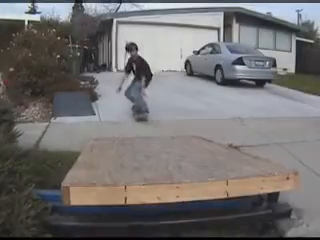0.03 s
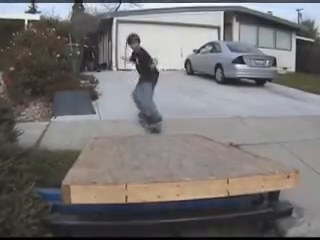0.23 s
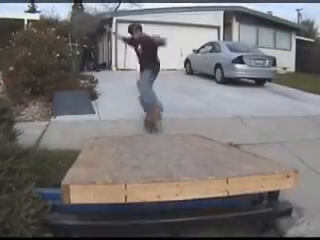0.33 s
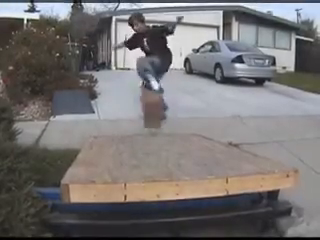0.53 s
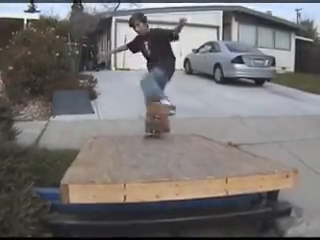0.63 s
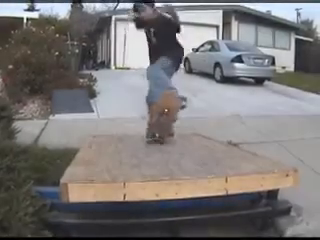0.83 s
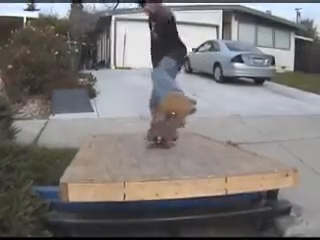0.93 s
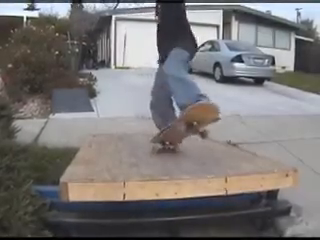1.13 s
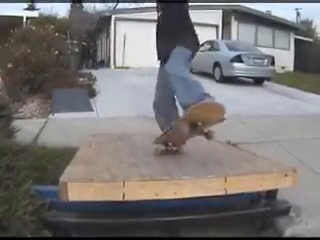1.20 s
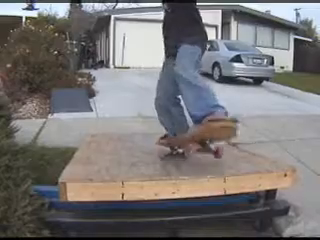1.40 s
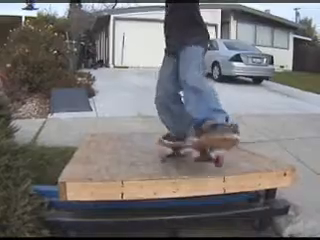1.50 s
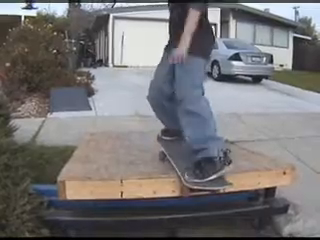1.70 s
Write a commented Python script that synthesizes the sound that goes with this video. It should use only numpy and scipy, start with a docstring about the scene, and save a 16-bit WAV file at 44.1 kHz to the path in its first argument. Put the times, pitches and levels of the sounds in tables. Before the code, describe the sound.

Skateboard wheels roll and clack, then land hard on wood with a hollow rumble.

```python
"""Skateboard jump onto a wooden platform

A skateboard rolls down a concrete driveway, clacks over a joint and pops into a jump, a shoe scraping
up the grip tape. It slams onto a hollow wooden platform and rumbles across on its back wheels while
the lifted front wheels spin free. A small, nearly mono microphone hears it from the platform's far end."""
import sys
import numpy as np
from scipy import signal
from scipy.fft import rfft, irfft
from scipy.io import wavfile
from scipy.ndimage import uniform_filter1d

SR = 44100
rng = np.random.default_rng(int(sys.argv[2]) if len(sys.argv) > 2 else 0)


def digitize_waveform(pressure):
    """Quantize a signal to 16-bit integers and store it at the path in sys.argv[1].

    Rows of a 2-D input are taken as channels; values are limited to [-1, 1].
    """
    field = np.atleast_2d(pressure).T
    bounded = np.clip(field, -1, 1)
    quanta = np.round(bounded * 32767).astype(np.int16)
    wavfile.write(sys.argv[1], SR, quanta)


N = 77175
TIME = np.arange(N) / SR
RING_TIME = TIME[:SR // 3]

# modes of deck and trucks: pitch_hz, level_db, t60_s
DECK_MODES = [(227, 2.5, 0.046), (531, -9.5, 0.061), (694, -3, 0.11), (785, -3.5, 0.034), (878, 4.5, 0.038),
              (1147, 2, 0.049), (1483, 2.5, 0.028), (1702, 2, 0.024), (2017, 6, 0.018), (2390, -5, 0.025),
              (2640, -2, 0.025)]
# modes of the hollow platform: pitch_hz, level_db, t60_s
PLATFORM_MODES = [(88.6, -8.5, 0.35), (160.6, 3, 0.14), (190.3, 0, 0.11), (238.5, 5, 0.082),
                  (283, 2, 0.079), (331.7, -3, 0.082), (426.6, -2, 0.08), (617.4, 1.5, 0.074),
                  (712, 0.5, 0.059), (894, -5.5, 0.044)]
# tone of wheels on concrete and of the board's clatter: freq_hz, gain_db
ROLL_EQ = [(40, -31), (110, -4.5), (230, -1), (400, 3.5), (770, 5.5), (2200, -0.5), (3200, -9.5),
           (7000, -15), (13000, -22.5)]
# tone of wheels on wood and of the platform's clatter: freq_hz, gain_db
GROWL_EQ = [(100, -21), (300, 4), (430, 2.5), (700, 2), (900, 1), (1500, -5.5), (2100, -2.5), (2700, -6),
            (3400, -17), (6000, -25), (13000, -46)]


def amp(db):
    """Decibels to gain."""
    return 10 ** (np.asarray(db) / 20)


def unit(x):
    """Scales to rms 1."""
    return x / np.sqrt(np.mean(x ** 2) + 1e-20)


def fader(curve, column=1):
    """Gain over time from one dB column; silent before the first point, held after the last."""
    rows = np.array(curve)
    return amp(np.interp(TIME, rows[:, 0], rows[:, column], left=-np.inf))


def decay(t60_s):
    """An envelope that falls 60 dB in t60_s."""
    return amp(-60 * RING_TIME / t60_s)


def add(mix, start_s, sound):
    """Mixes a sound in at start_s."""
    part = mix[round(start_s * SR):][:len(sound)]
    part += sound[:len(part)]


def through(x, response):
    """Convolves and keeps the length."""
    return signal.fftconvolve(x, response)[:len(x)]


def colour(x, eq, size=4096):
    """Minimum-phase EQ; the result has rms 1."""
    freq_hz, gain_db = np.transpose(eq)
    bins_hz = abs(np.fft.fftfreq(size, 1 / SR))
    log_gain = np.log(amp(np.interp(np.log(bins_hz + 1), np.log(freq_hz), gain_db)))
    spectrum = np.exp(signal.hilbert(log_gain).conj())
    return unit(through(x, np.fft.ifft(spectrum).real[:size // 2]))


def grit(per_s, spread_db):
    """Tiny random impacts of uneven size."""
    sizes = amp(spread_db * np.minimum(rng.exponential(1, N), np.pi))
    return unit(sizes * rng.choice([-1, 1], N) * (rng.random(N) < per_s / SR))


def flutter(rate_hz, depth_db):
    """A gain that wavers at random, up to about rate_hz."""
    rolloff = np.exp(-(np.fft.rfftfreq(N, 1 / SR) / rate_hz) ** 2)
    wobble = irfft(rfft(rng.standard_normal(N)) * rolloff, N)
    return unit(amp(depth_db * unit(wobble)))


def ring(modes):
    """Dying sines of a struck body."""
    return sum(amp(level_db) * decay(t60_s) * np.sin(2 * np.pi * pitch_hz * RING_TIME)
               for pitch_hz, level_db, t60_s in modes)


def resonate(grains, modes, ring_db):
    """Grains heard directly and through the modes of the body they shake."""
    return grains + amp(ring_db) * unit(through(grains, ring(modes)))


def strike(body, centre_hz, q, attack_samples=256):
    """A blow excites the modes near its centre frequency; the attack has rms 1."""
    sound = signal.lfilter(*signal.iirpeak(centre_hz, q, SR), body)
    return sound / np.sqrt(np.mean(sound[:attack_samples] ** 2))


def air():
    """A faint bed of low rumble and hiss, different left and right."""
    # tone of the bed: freq_hz, gain_db
    air_eq = [(25, 31), (100, 17), (600, -14), (8000, -17), (13000, -6)]
    return amp(-60) * np.array([colour(noise, air_eq) for noise in rng.standard_normal((2, N))])


def yard_echo(x, level_db=-20.5, predelay_s=0.008, damping_hz=3400):
    """Dull, thin echoes from house and garage."""
    taps = grit(per_s=1300, spread_db=1)[:len(RING_TIME)] * decay(t60_s=0.46) * (RING_TIME > predelay_s)
    tail = signal.lfilter(*signal.butter(1, damping_hz, fs=SR), taps)
    return amp(level_db) * through(x, tail / np.linalg.norm(tail))


def early_reflections(x, lift_above_hz=880):
    """Scattered reflections differ at the two capsules, most in the treble, and add a little width."""
    taps = rng.standard_normal(512)
    bright = x + np.diff(x, prepend=0) * SR / (2 * np.pi * lift_above_hz)
    side = amp(-31) * through(bright, taps / np.linalg.norm(taps))
    return np.array([side, -side])


def bearings():
    """Balls rattle in the races of the lifted wheels; each resonance wavers on its own."""
    # swell of the free spin: time_s, level_db
    spin_curve = [(.36, -46), (.5, -46), (.78, -49), (.84, -37.5), (.9, -51), (1.2, -45.5), (1.6, -45.5),
                  (1.75, -42)]
    # resonances of the races: pitch_hz, width_hz, level_db
    race_modes = [(1180, 260, 1), (2478, 290, 3.5), (3610, 220, 0), (5760, 1260, -2.5), (7740, 640, 2)]
    # tone of the balls' hiss: freq_hz, gain_db
    hiss_eq = [(700, -18), (1500, -7), (4500, -2.5), (9500, -1), (13000, -9.5)]
    whirr = np.zeros(N)
    for pitch_hz, width_hz, level_db in race_modes:
        envelope = RING_TIME * np.exp(-np.pi * width_hz * RING_TIME)
        ping = envelope * np.sin(2 * np.pi * pitch_hz * RING_TIME)
        rattle = unit(through(grit(per_s=2500, spread_db=2), ping))
        whirr += amp(level_db) * rattle * flutter(rate_hz=17, depth_db=3)
    hiss = colour(grit(per_s=6400, spread_db=2), hiss_eq)
    return fader(spin_curve) * (amp(1) * unit(whirr) + hiss)


def concrete_roll():
    """Grains of concrete shake wheels and deck."""
    # swell of the roll: time_s, level_db
    roll_curve = [(0, -35), (.06, -37.5), (.18, -37.5), (.295, -35.5), (.335, -33), (.41, -27), (.475, -35),
                  (.505, -30), (.585, -31.5), (.63, -40), (.78, -42)]
    shake = resonate(grit(per_s=3000, spread_db=3), DECK_MODES, ring_db=-19)
    return fader(roll_curve) * colour(shake, ROLL_EQ)


def scrape():
    """The tail drags, then the shoe rasps up the grip tape in small slips that make the deck ring."""
    # strokes of tail and shoe: time_s, rasp_db, fizz_db
    scrape_curve = [(.24, -58, -47.5), (.33, -62, -43), (.42, -30, -32), (.47, -43, -45.5),
                    (.52, -35, -32.5), (.558, -23, -37), (.58, -26, -33.5), (.62, -31.5, -34),
                    (.65, -38.5, -48), (.692, -51, -50), (.70, -36, -41), (.745, -37.5, -69),
                    (.78, -60, -52)]
    # tone of the midrange rasp: freq_hz, gain_db
    rasp_eq = [(300, -37), (800, -13.5), (1200, 1), (1950, -1.5), (2700, -2.5), (3300, -14.5), (6000, -15),
               (13000, -39)]
    # tone of the fine fizz: freq_hz, gain_db
    fizz_eq = [(300, 3.5), (3000, -9), (5800, 1.5), (7800, 0.5), (10000, -5.5), (13000, -4.5)]
    shake = resonate(grit(per_s=2800, spread_db=3.5), DECK_MODES, ring_db=-6)
    rasp = colour(shake, rasp_eq) * fader(scrape_curve)
    fizz = colour(grit(per_s=6700, spread_db=3.5), fizz_eq) * fader(scrape_curve, column=2)
    slips = flutter(rate_hz=270, depth_db=2.2)
    return slips * (rasp + fizz)


def wood_roll():
    """Loaded wheels growl on the plywood and shake the deck; the hollow box under them booms."""
    # ride across the platform: time_s, boom_db, growl_db
    rumble_curve = [(.745, -56, -58), (.765, -22, -12), (.805, -21.5, -18.5), (.85, -27, -25.5),
                    (.89, -24, -28), (.975, -29.5, -28), (1.025, -24.5, -29), (1.115, -28.5, -30),
                    (1.15, -33, -35.5), (1.24, -42, -49), (1.29, -34, -42.5), (1.315, -30, -33.5),
                    (1.38, -36, -35.5), (1.41, -40.5, -62), (1.48, -42.5, -56), (1.75, -50, -73)]
    # tone of the hollow boom: freq_hz, gain_db
    boom_eq = [(25, -34), (50, -33.5), (95, -7), (165, -7), (255, 1), (320, 1), (450, -9.5), (3000, -82)]
    box_shake = resonate(grit(per_s=2600, spread_db=1.5), PLATFORM_MODES, ring_db=-11.5)
    deck_shake = resonate(grit(per_s=2600, spread_db=1.5), DECK_MODES, ring_db=-14.5)
    boom = colour(box_shake, boom_eq) * fader(rumble_curve)
    growl = colour(deck_shake, GROWL_EQ) * fader(rumble_curve, column=2)
    return boom + growl


def platform_thumps():
    """The landing and the bumps after it ring the platform and rattle its boards."""
    # blows on the platform: start_s, level_db, centre_hz
    thumps = [(.7536, -8.5, 725), (.7637, -8.5, 662), (0.768, -14.5, 85.5), (.7847, -10, 680),
              (.7935, -14.5, 340), (.8015, -14, 660), (0.8184, -17, 144), (0.8432, -22, 162),
              (0.8823, -21.5, 477), (1.3224, -30, 220), (1.3388, -22.5, 222.5), (1.3624, -19.5, 217),
              (1.3833, -23, 198)]
    mix, box = np.zeros(N), ring(PLATFORM_MODES)
    for start_s, level_db, centre_hz in thumps:
        clatter = colour(rng.standard_normal(len(RING_TIME)), GROWL_EQ) * decay(t60_s=0.065)
        add(mix, start_s, amp(level_db) * strike(box + clatter, centre_hz, q=3.13))
    return mix


def board_knocks(crack_decay_s=0.0033):
    """Each knock is a short crack, the deck's modes and a dense dying clatter."""
    # blows on the board: start_s, body_db, crack_db, centre_hz
    knocks = [(0.1985, -20, -55, 306), (0.2001, -19, -20, 780), (0.2052, -17.5, -26.5, 880),
              (.2115, -25.5, -29.5, 790), (0.356, -19, -16, 330), (0.3562, -12.5, -15, 1730),
              (.3575, -18, -33, 780), (.4155, -26, -20, 760), (0.5395, -24, -29, 1430),
              (.5513, -16.5, -23, 1960), (.5605, -25, -19, 1930), (0.5941, -23.5, -33, 1810),
              (0.6973, -27, -58, 1250), (0.7485, -9, -19, 1070), (0.7509, -9, -11.5, 2290),
              (0.7569, -10.5, -9.5, 2400), (0.8615, -27.5, -23, 2020), (1.3225, -30, -39, 1330)]
    mix, deck = np.zeros(N), ring(DECK_MODES)
    for start_s, body_db, crack_db, centre_hz in knocks:
        clatter_noise, crack_noise = rng.standard_normal((2, len(RING_TIME)))
        clatter = amp(7.5) * colour(clatter_noise, ROLL_EQ) * decay(t60_s=0.046)
        body = strike(deck + clatter, centre_hz, q=1.88)
        # tone of the bright crack: freq_hz, gain_db
        crack_eq = [(200, -31), (900, -36), (2300, 7.5), (4000, -1), (7000, -8.5), (10000, -12),
                    (13000, -31)]
        crack = colour(crack_noise, crack_eq) * np.exp(-RING_TIME / crack_decay_s)
        add(mix, start_s, amp(body_db) * body + amp(crack_db) * crack)
    return mix


def scene():
    """The board in the centre, with its reflections, over faint air."""
    board = board_knocks() + platform_thumps() + concrete_roll() + scrape() + wood_roll() + bearings()
    return air() + board + yard_echo(board) + early_reflections(board)


def record(dry, low_cut_hz=55, soften_hz=10100, cutoff_hz=12300):
    """A small microphone with little bass, a fast limiter, soft overload and a band limit."""
    threshold_db, release_db_per_s, ceiling_db = -14, 143, -8
    mic = signal.lfilter(*signal.butter(2, low_cut_hz, "high", fs=SR), dry)
    mic = signal.lfilter(*signal.butter(2, soften_hz, fs=SR), mic)
    power_db = 10 * np.log10(abs(uniform_filter1d((mic ** 2).mean(0), size=64)) + 1e-12)
    # the limiter grabs each peak and lets go at a steady rate
    release_db = TIME * release_db_per_s
    held_db = np.maximum.accumulate(power_db + release_db) - release_db
    reduction_db = np.maximum(held_db - threshold_db, 0)
    limited = mic / amp(uniform_filter1d(reduction_db, size=32))
    saturated = limited / (1 + (limited / amp(ceiling_db)) ** 4) ** (1 / 4)
    lowpass = signal.firwin(255, cutoff_hz, window=("kaiser", 9), fs=SR)
    return signal.oaconvolve(saturated, lowpass[None], "same")


dry = scene()
out = record(dry)
digitize_waveform(out)
```